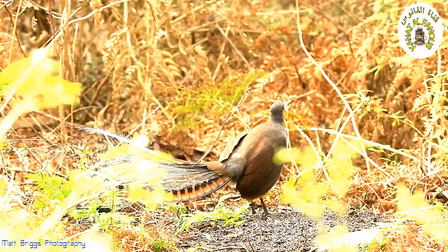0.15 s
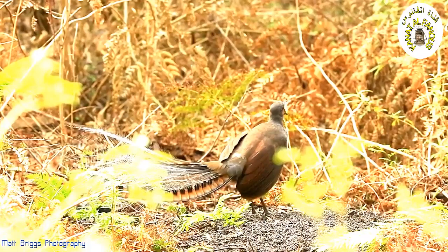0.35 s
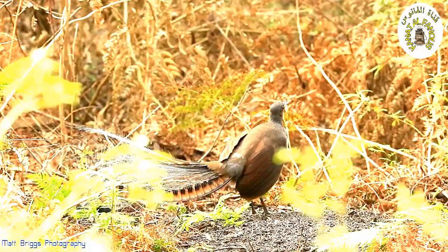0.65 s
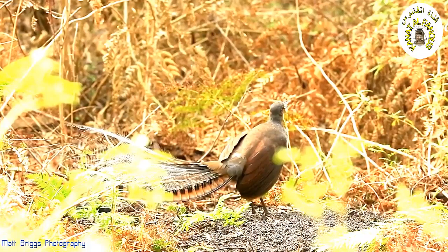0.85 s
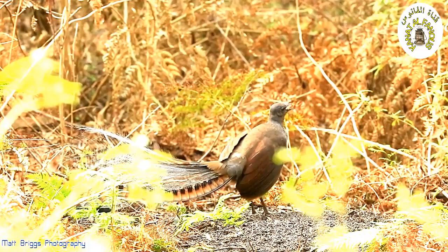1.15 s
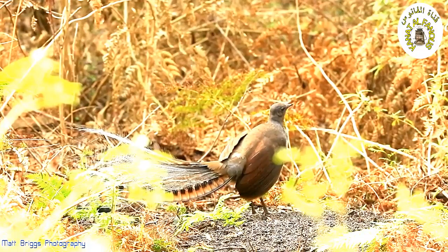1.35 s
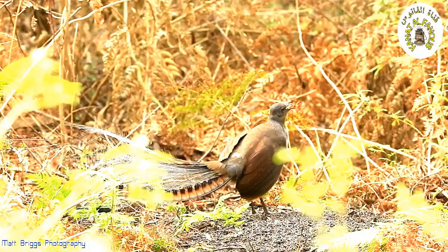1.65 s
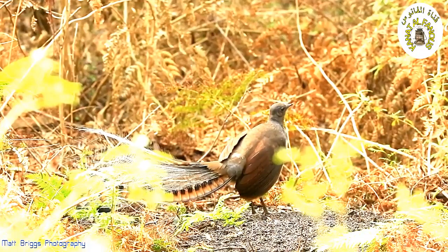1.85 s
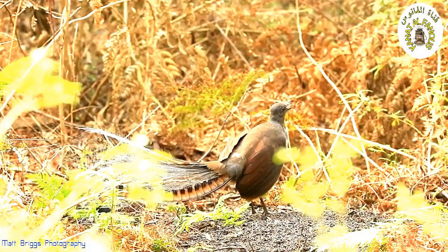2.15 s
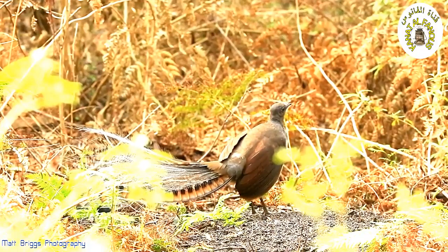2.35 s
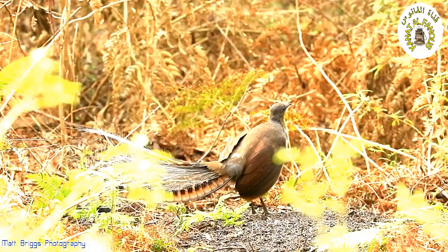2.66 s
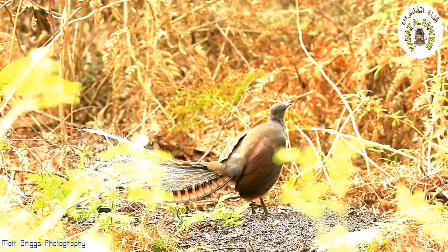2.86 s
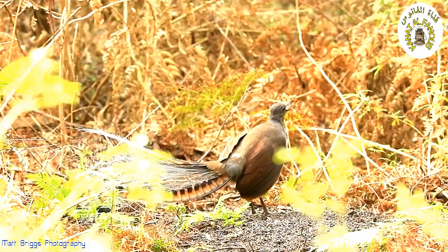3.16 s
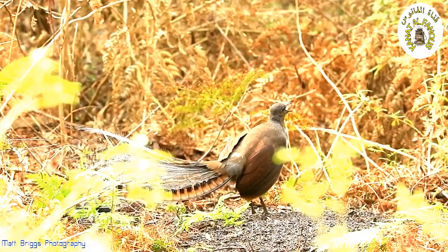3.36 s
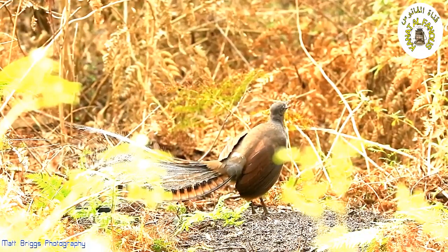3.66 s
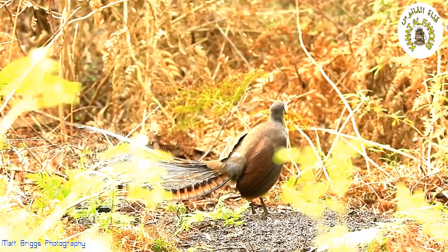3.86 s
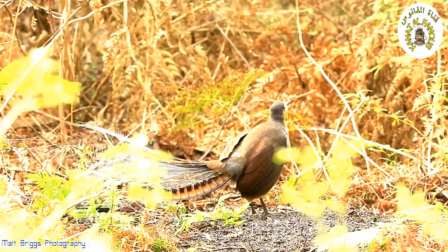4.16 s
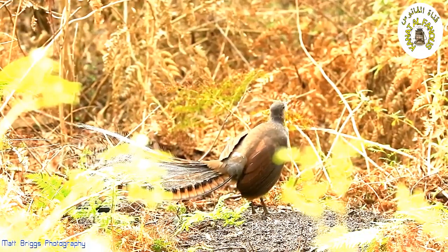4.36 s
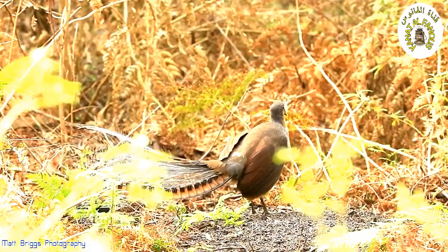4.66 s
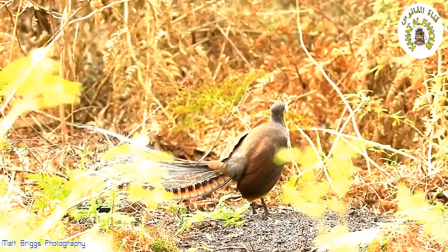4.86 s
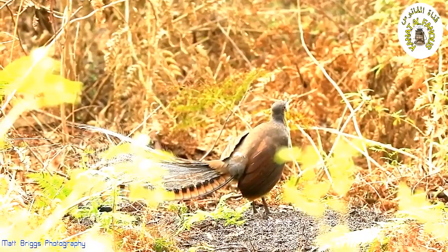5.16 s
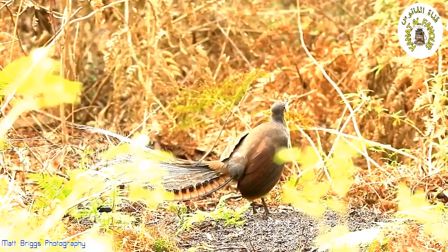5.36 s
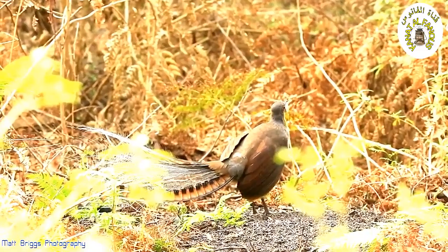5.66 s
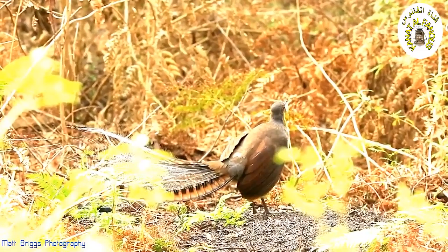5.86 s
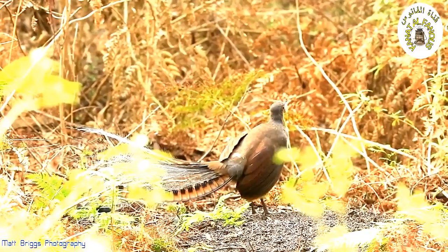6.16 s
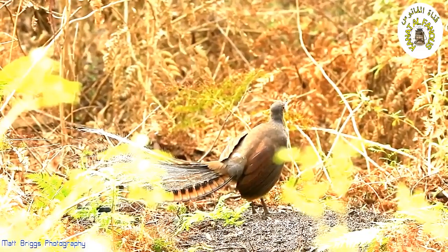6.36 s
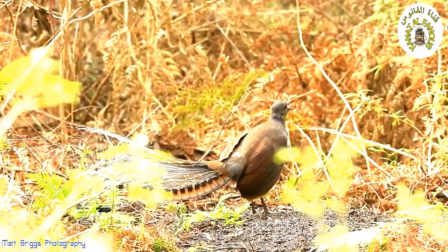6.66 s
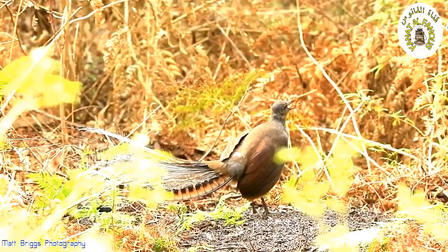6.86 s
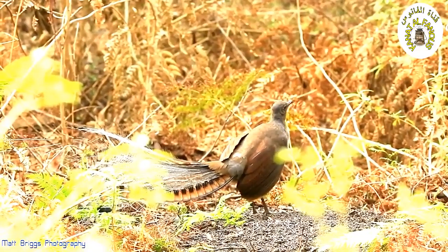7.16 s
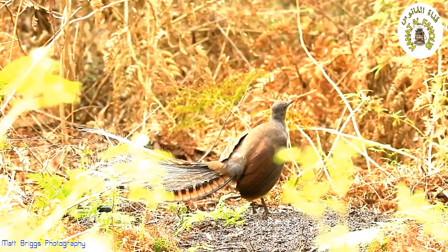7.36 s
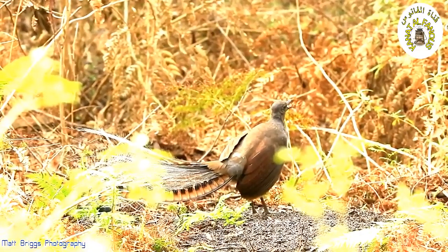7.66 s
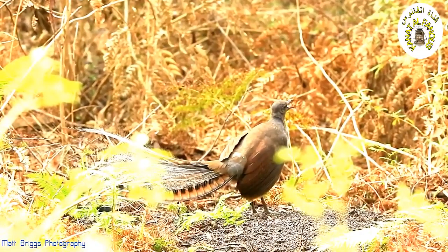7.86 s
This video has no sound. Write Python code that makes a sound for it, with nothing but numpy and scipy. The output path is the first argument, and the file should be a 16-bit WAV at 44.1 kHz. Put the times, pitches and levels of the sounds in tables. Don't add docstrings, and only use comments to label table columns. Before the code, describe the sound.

Outdoors on a forest floor, with low airy hum, leaf rustle and faint hiss, a near lyrebird sings in separated bursts: dropping and arching whistles, dry clicks, short chopped stutters, then after a twig crack a strong run of pure whistles and low leaps. Tiny high birds chip far off. Soft footfalls and ticking litter surround a final falling whistle. The song is close and direct, with a clear woodland echo tail.

```python
import sys
import numpy as np
from scipy import signal
from scipy.fft import rfft, irfft
from scipy.io import wavfile
from scipy.ndimage import uniform_filter1d, minimum_filter1d, map_coordinates

SR = 44100
rng = np.random.default_rng(int(sys.argv[2]) if len(sys.argv) > 2 else 0)


def nominal_scale(level):
    x = np.asarray(level, float) / 20
    return 10 ** x


def file_out(sig):
    cols = np.atleast_2d(sig).T
    lim = np.clip(cols, -1, 1)
    pcm = np.round(lim * 32767).astype(np.int16)
    wavfile.write(sys.argv[1], SR, pcm)


N = 353241

# (time [s], pitch [Hz], level [dB])
DROP = [(.296, 1770, -38), (.306, 1667, -18.5), (.314, 1674, -14), (.338, 1374, -9), (.349, 1235, -14.5),
        (.358, 1125, -35), (.374, 898, -32.5), (.407, 853, -34.5), (.452, 925, -41)]
ARCH = [(.512, 1517, -32), (.535, 1685, -16), (.553, 1678, -15.5), (.587, 2600, -17.5), (.6, 2675, -15.5),
        (.666, 1783, -13), (.683, 1316, -14), (.692, 972, -29.5), (.718, 597, -42)]
PIP = [(1.718, 1620, -33), (1.724, 1410, -21.5), (1.729, 1394, -17.5), (1.737, 1527, -18),
       (1.744, 1600, -27.5)]
CHOP = [(1.762, 3390, -41), (1.766, 2530, -27.5), (1.769, 2780, -18.5), (1.773, 2563, -14.5),
        (1.777, 2666, -18.5), (1.781, 2780, -20.5), (1.785, 2650, -32.5)]
PIP_UP = [(2.237, 2080, -49), (2.242, 1670, -32), (2.248, 1516, -22.5), (2.256, 1547, -27),
          (2.263, 1845, -23.5), (2.2665, 1980, -22)]
CHOP_HIGH = [(2.282, 4640, -37.5), (2.286, 3320, -29), (2.289, 2550, -16.5), (2.293, 2996, -17),
             (2.297, 2650, -16.5), (2.302, 2663, -21), (2.306, 2666, -9.5), (2.309, 2730, -24)]
PLUNGE = [(4.014, 4860, -47), (4.028, 5850, -53), (4.043, 3920, -26), (4.053, 3510, -27.5),
          (4.07, 3026, -19.5), (4.089, 2870, -9), (4.11, 2851, -14.5), (4.121, 2938, -10.5),
          (4.146, 2977, -20)]
SWELL = [(4.215, 2006, -53.5), (4.246, 2037, -23.5), (4.268, 2018, -13), (4.308, 1991, -4.5),
         (4.325, 1977, -21), (4.343, 1978, -7.5), (4.353, 1970, -33.5)]
SLIDE = [(4.803, 4156, -47), (4.811, 3637, -17.5), (4.82, 3475, -16), (4.862, 3412, -9), (4.874, 3170, -12),
         (4.907, 2773, -10), (4.92, 2530, -13.5), (4.933, 2166, -21.5), (4.941, 1960, -19)]
STEP = [(4.938, 1917, -29), (4.969, 1946, -15.5), (5.012, 1850, -16.5), (5.025, 1713, -23.5),
        (5.038, 1335, -23.5), (5.045, 1250, -38)]
LONG = [(6.757, 1266, -23), (6.761, 1535, -26.5), (6.772, 1745, -18), (6.82, 1610, -25.5),
        (6.87, 1575, -22), (6.966, 1554, -21), (7.05, 1478, -19), (7.15, 1402, -16.5), (7.17, 1300, -38)]
# (time from note start [s], pitch [Hz], level [dB])
ZIP = [(0, 1865, -43), (.0025, 2580, -27.5), (.005, 3930, -23), (.0075, 4480, -35)]
SCOOP = [(0, 1810, -42), (.018, 1301, -44.5), (.041, 847, -45.5), (.066, 827, -47.5), (.092, 1072, -38),
         (.106, 1360, -24.5), (.116, 1740, -36), (.124, 1952, -43.5), (.134, 2160, -25)]
TAIL = [(0, 2167, -29.5), (.007, 1765, -24.5), (.016, 1586, -31.5), (.028, 1323, -22), (.049, 1170, -27),
        (.066, 823, -44)]
GRIP = [(0, 1103, -36), (.013, 920, -22.5), (.024, 911, -24.5), (.042, 903, -25), (.055, 752, -32),
        (.059, 1000, -27.5), (.063, 1457, -17), (.068, 1413, -26)]
LEAP = [(0, 1428, -16.5), (.005, 1406, -6), (.016, 1613, -12), (.028, 1806, -6), (.053, 1838, -13.5),
        (.061, 1860, -21.5), (.07, 1770, -38)]
CLEAN, HAZY, HUSKY, HOARSE = .1, .25, .5, .95
ONCE = [(DROP, (-29, -51, -50, -45, CLEAN)), (ARCH, (-38.5, -49, -39.5, -46, HUSKY)),
        (PLUNGE, (-39, -37, -42, -53, CLEAN)), (SWELL, (-47, -51.5, -55.5, -50, CLEAN)),
        (SLIDE, (-32.5, -37, -45, -50.5, CLEAN)), (STEP, (-40, -46, -55, -59.5, HUSKY)),
        (LONG, (-33, -29, -37, -48.5, CLEAN)), (PIP, (-21.5, -31, -48, -39, CLEAN)),
        (PIP_UP, (-17, -23.5, -39.5, -35, CLEAN)), (CHOP, (-13, -32.5, -44, -53, CLEAN)),
        (CHOP_HIGH, (-13.5, -32.5, -47, -60, HAZY))]
# (shape, voice, first start [s], repeat (start [s], stretch [ratio], pitch [ratio], level [dB]))
AGAIN = [
    (ZIP, (-35, -48, -42, -49, HUSKY), .9495, (1.1865, .96, .98, -4)),
    (SCOOP, (-35, -46, -52, -56, HUSKY), .962, (1.205, .92, .97, 0)),
    (TAIL, (-26, -48, -56, -60, HUSKY), 1.813, (2.328, .86, 1.01, -1.5)),
    (GRIP, (-32, -46, -42, -41, HUSKY), 4.405, (4.591, 1.02, 1.044, -2.5)),
    (LEAP, (-34, -43, -43, -52, CLEAN), 4.472, (4.662, .87, .98, -1)),
]
# (time [s], length [s], from [Hz], to [Hz],
# level [dB])
STUTTER = [(1.783, 0.013, 2600, 2330, -17.5), (1.7915, 0.0045, 2400, 2350, -5),
           (1.798, 0.0075, 2560, 2250, -13.5), (1.805, 0.0049, 2055, 1990, -18.5),
           (1.808, 0.0044, 1990, 2150, -15.5), (2.312, 0.0081, 1870, 2150, -23),
           (2.316, 0.0088, 2124, 2540, -18.5), (6.754, 0.0043, 1500, 1180, -25)]
STUTTER_VOICE = (-30, -36, -53, -58.5, HOARSE)
# (centre [Hz], width [ratio], lift [dB])
THROAT = [(3380, 0.1, 5.5), (4348, 0.15, 10.5), (11500, .16, 5.5)]
# (time [s], peak level [dB], pitch [Hz])
CLICKS = [(.9103, -34, 1740), (1.0934, -29, 1940), (1.1091, -28, 1500), (1.1389, -28, 1650),
          (1.3314, -32, 1350), (1.3538, -26, 1640), (1.9003, -25, 1420), (2.395, -33, 1250),
          (2.408, -31, 1400)]
# (time [s], peak level [dB], pitch [Hz])
BILL = [(.9505, -34, 4930), (.952, -41, 7930), (.953, -35, 3584), (1.1875, -38.5, 5100),
        (1.189, -40.5, 7540), (1.19, -38, 3700), (.885, -47, 5150)]
# (time [s], level [dB])
TURNED = [(0, 2), (.3, 0), (0.621, 0.5), (.9, -2), (1.5, 0), (1.7, 0.5), (2.501, 0.5), (3.901, 0),
          (6.502, 0), (6.7, -2)]
# (frequency [Hz], level [dB])
SPRAY = [(2800, -1), (4000, 2), (6000, 8.5), (12000, 10.5)]

# (frequency [Hz], t60 [s])
FERNS = [(700, 0.031), (3000, 0.18), (10000, 0.12)]
TRUNKS = [(700, 0.93), (1500, 0.59), (2500, 0.92), (4000, 0.63), (6000, 0.63), (10000, 0.6)]
HILL = [(700, 6.6), (1800, 4.96), (3500, 2.78), (6000, 2.4), (10000, 1.3)]

# (time [s], level [dB])
WHISTLES = [(1.516, -52), (2.009, -49), (2.498, -46.5), (3.176, -45.5), (6.671, -50)]
# (time [s], pitch [Hz], level [dB])
WHISTLE = [(0, 3727, -2), (.01, 4090, -2), (.033, 4234, -1.5), (.048, 4570, -4.5), (.066, 4530, -10)]
# (time [s], level [dB], pitch [Hz])
CHIPS = [(0.104, -49, 7590), (.41, -54.5, 8230), (.92, -57, 7600), (1.545, -62, 7980), (2.121, -52.5, 7800),
         (2.409, -53.5, 7550), (2.58, -47.5, 7460), (2.64, -57.5, 8230), (2.829, -51, 7280),
         (3.307, -46, 7400), (3.7, -61, 8300), (4.28, -47, 7440), (4.548, -53, 7470), (5.026, -58, 7350),
         (6.071, -58, 7460), (6.085, -46, 7440), (6.315, -48.5, 7640), (6.5, -62, 7670), (6.78, -49, 7580),
         (7.3, -52.5, 7660), (7.535, -57, 8370), (7.574, -58, 8460), (7.77, -50, 7540)]
# (time [s], length [s], from [Hz], to [Hz], level [dB])
CLEAR = [(.155, 0.058, 2880, 5940, -34.5), (3.057, 0.023, 5430, 6370, -53), (3.068, 0.021, 6150, 6330, -52),
         (3.078, .027, 5100, 3690, -55), (3.1, 0.047, 5540, 6130, -68), (3.094, 0.055, 6800, 7000, -59),
         (5.946, 0.04, 5800, 6100, -57), (5.965, 0.018, 4520, 3820, -53), (7.246, 0.041, 7350, 7740, -59.5),
         (7.823, 0.014, 5300, 6320, -51), (7.836, 0.017, 6060, 6300, -57)]
BREATHY = [(2.95, 0.088, 3310, 2074, -55), (3.52, 0.034, 6950, 6440, -51.5), (3.66, 0.053, 8360, 8000, -60),
           (3.356, 0.074, 6340, 8000, -55.5), (3.36, 0.068, 6790, 6570, -48),
           (3.518, 0.15, 6390, 5980, -48.5), (6.39, 0.19, 2704, 2206, -55)]
# (time [s], length [s], from [Hz], to [Hz], level [dB])
HIDDEN = [
    (0.314, 0.071, 3900, 4760, -41.5),
    (2.974, .09, 2960, 2160, -51),
    (3.881, 0.04, 2900, 2060, -47),
]

# (time [s], peak level [dB], pitch [Hz])
SNAP = [(3.8258, -17, 1640), (3.826, -29.5, 770), (3.826, -44, 4230), (3.826, -27.5, 5070),
        (3.836, -28, 1300), (3.845, -31, 1030)]
# (time [s], peak level [dB], pitch [Hz])
TWIGS = [(3.449, -39.5, 2600), (6.508, -43, 1380), (6.5535, -37.5, 1860), (6.621, -36, 1040),
         (7.6294, -48, 1450), (7.7338, -40.5, 1390), (7.913, -41, 2700), (7.9166, -36, 3900),
         (7.926, -39.5, 1700), (7.9364, -37.5, 2280), (7.9475, -41, 1330)]
# (time [s], peak level [dB], pitch [Hz])
TICKS = [(0.0473, -45, 5700), (4.9656, -35.5, 13000), (4.9666, -34.5, 9030), (5.201, -43, 5290),
         (5.4725, -40.5, 5210), (5.5193, -40, 8250), (6.508, -40.5, 7550), (6.6875, -39, 4570),
         (7.5266, -44, 6000), (7.631, -40.5, 8600), (7.7028, -40.5, 5500)]
# (time [s], peak level [dB], pitch [Hz])
THUDS = [(5.199, -34, 320), (6.618, -27, 316), (6.675, -37, 212), (6.704, -29, 665), (7.616, -26, 503)]
# (time [s], length [s], level [dB])
STIRS = [
    (5.4, .1, -63),
    (5.7, .22, -57),
    (6.498, .24, -64),
    (7.503, .22, -60),
]
# (time [s], hum level [dB], rustle level [dB])
FOREST = [(0, -45, -58), (.71, -50, -63), (1.269, -47.5, -58), (1.56, -49, -77.5), (1.81, -50.5, -52),
          (1.92, -48, -73), (3.99, -49.5, -63), (4.3, -46.5, -49), (4.6, -49, -57), (4.78, -50, -56),
          (4.93, -52.5, -51.5), (5.15, -52, -67.5), (5.75, -47, -56.5), (6.5, -46.5, -60), (6.76, -46, -51),
          (6.98, -42.5, -56.5), (7.39, -45.5, -59.5), (8.01, -47.5, -60.5)]
# (frequency [Hz], density [dB per Hz])
STIRRED = [(2500, -20), (4500, 4.5), (8500, 4), (11000, -2.5), (15600, -9.5)]
HUM = [(12, -62.5), (23, -16.5), (81, -11.5), (287, -3), (332, -3.5), (409, -4), (436, -9.5), (610, 0),
       (908, -17.5), (988, -13), (1670, -15), (2540, -35), (3000, -29.5), (3900, -57.5), (6600, -120)]
RUSTLE = [(1180, -9.5), (2000, -1.5), (2240, -4), (2550, -6.5), (4160, -13.5), (7930, -19.5), (9180, -21.5),
          (14900, -23.5), (15600, -32.5)]
HISS = [(1760, -26.5), (3000, 0.5), (5000, -2.5), (6600, -6.5), (7630, -4), (11000, -12), (15600, -15)]


def along(points, hz):
    f, v = np.transpose(points)
    return np.interp(np.log(hz + 1), np.log(f + 1), v)


def wobble(rate, n=N):
    return map_coordinates(rng.standard_normal(int(n * rate / SR) + 4), [np.arange(n) * rate / SR])


def add(track, s, sound):
    part = track[round(s * SR):][:len(sound)]
    part += sound[:len(part)]


def note(rows, voice, flutter):
    s, hz, db = np.transpose(rows)
    *overtones_db, hoarse = voice
    t = np.arange(s[0], s[-1], 1 / SR)
    n = len(t)
    hz = uniform_filter1d(np.interp(t, s, hz), size=min(90, n // 6), mode="nearest")
    hz *= 1 + flutter * wobble(90, n)
    hz *= 1 + .018 * hoarse ** 2 * wobble(350, n)
    db = uniform_filter1d(np.interp(t, s, db), size=70, mode="nearest")
    phase = 2 * np.pi * np.cumsum(hz) / SR

    glide = uniform_filter1d(np.gradient(np.log(hz)) * SR, size=300, mode="nearest")
    falling, rising = np.clip(-glide, 0, 25), np.clip(glide, 0, 25)
    effort = np.clip(falling + .3 * rising - 1, 0, 4)
    strain = .1 * uniform_filter1d(effort, size=1500, mode="nearest")

    tone = np.sin(phase)
    for k in range(2, 10):
        level = overtones_db[min(k, 5) - 2] - 4.4 * max(k - 5, 0) + 1.87 * wobble(40.4, n)
        level += .22 * (db - db.max())
        level -= falling + .5 * (k > 3) * rising
        for centre_hz, width, lift_db in THROAT:
            level += lift_db * np.exp(-(np.log(k * hz / centre_hz) / width) ** 2)
        scatter_rad = (hoarse + strain) * (k - 1.2) * wobble(600, n)
        tone += nominal_scale(level) * (k * hz < SR / 2) * np.sin(k * phase + scatter_rad)

    ramp_s = min(.004, n / SR / 5)
    edge = np.clip(np.minimum(t - s[0], s[-1] - t) / ramp_s, 0, 1)
    return np.sqrt(2) * nominal_scale(db) * edge * tone


def knocks(events, cycles, crack, smooth, rise=4):
    out, t = np.zeros(N), np.arange(SR // 20) / SR
    fade = nominal_scale(-60 * t / .009)
    for s, db, hz in events:
        ring = np.sin(2 * np.pi * hz * t) * nominal_scale(-60 * t * hz / cycles)
        ring *= 1 - np.exp(-t * hz * rise)
        noise = signal.lfilter(np.hanning(smooth + 2), 1, rng.standard_normal(len(t))) / np.sqrt(smooth)
        add(out, s, nominal_scale(db) * (1.77 * ring + crack * fade * noise))
    return out


def singer():
    out = knocks(CLICKS, cycles=30, crack=0.35, smooth=12, rise=1.2)
    notes = list(ONCE)
    for shape, voice, first, (s, stretch, ratio, db) in AGAIN:
        notes.append((np.add(shape, [first, 0, 0]), voice))
        notes.append((np.multiply(shape, [stretch, ratio, 1]) + [s, 0, db], voice))
    for s, length, from_hz, to_hz, db in STUTTER:
        middle = (s + length / 2, np.sqrt(from_hz * to_hz), db)
        notes.append(([(s, from_hz, db - 6), middle, (s + length, to_hz, db - 3)], STUTTER_VOICE))
    for rows, voice in notes:
        sound = note(rows, voice, flutter=.0026)
        tremble_db = 1.12 * (1.08 + voice[-1]) * wobble(130.7, len(sound))
        add(out, rows[0][0], sound * nominal_scale(tremble_db))
    return out


def scatter(decays, delay):
    hz, t, z = signal.stft(rng.standard_normal(5 * SR // 2), SR, nperseg=256)
    tail = signal.istft(z * nominal_scale(-60 * t / along(decays, hz)[:, None]), SR, nperseg=256)[1]
    tail *= np.clip(np.arange(len(tail)) / SR / delay - 1, 0, 1)
    return tail / np.linalg.norm(tail)


def trunks(x, ferns_db, trunks_db):
    echoes = nominal_scale(ferns_db) * scatter(FERNS, delay=0.0017) + nominal_scale(trunks_db) * scatter(TRUNKS, delay=0.01)
    return x + signal.fftconvolve(x, echoes)[:N]


def near_bird():
    bird = singer()
    sent = bird * nominal_scale(np.interp(np.arange(N) / SR, *np.transpose(TURNED)))
    sent = irfft(rfft(sent) * nominal_scale(along(SPRAY, np.fft.rfftfreq(N, 1 / SR))), N)
    near = bird + trunks(sent, ferns_db=-12, trunks_db=-12) - sent
    slope = nominal_scale(-30.5) * signal.fftconvolve(sent, scatter(HILL, delay=0.034))[:N]
    bill = trunks(knocks(BILL, cycles=17.4, crack=0.5, smooth=6), ferns_db=5, trunks_db=8.5)
    return near + slope + bill


def sweep(length, from_hz, to_hz, db, breath):
    n = max(int(length * SR), 8)
    hz = np.geomspace(from_hz, to_hz, n) * (1 + 0.045 * breath * wobble(1500, n))
    phase = 2 * np.pi * np.cumsum(hz) / SR
    octave = np.clip(breath - .55, 0, .15)
    swell = np.sin(np.pi * np.arange(n) / n) ** 0.8
    return np.sqrt(2) * nominal_scale(db) * swell * (np.sin(phase) + octave * np.sin(2 * phase))


def far_birds():
    out = np.zeros(N)
    for s, db in WHISTLES:
        add(out, s, nominal_scale(db + 6.5) * note(WHISTLE, voice=(-48, -69, -74, -76, 0), flutter=.002))
    for s, db, hz in CHIPS:
        add(out, s, sweep(.01, 1.24 * hz, .68 * hz, db - 5, breath=.9))
        add(out, s + .006, sweep(.014, 1.02 * hz, .99 * hz, db, breath=.3))
        add(out, s + .017, sweep(.016, .99 * hz, 1.06 * hz, db - 4, breath=.3))
        add(out, s - .012, sweep(.014, 1.02 * hz, 1.08 * hz, db - 8, breath=.5))
    for calls, breath in ((CLEAR, .1), (BREATHY, .75)):
        for s, *call in calls:
            add(out, s, sweep(*call, breath * 6500 / call[1]))
    return out


def hidden():
    out = np.zeros(N)
    for s, *call in HIDDEN:
        add(out, s, sweep(*call, .3 * 6500 / call[1]))
    return trunks(out, ferns_db=-8, trunks_db=-3.5) - out


def litter():
    ticks = knocks(TICKS, cycles=22, crack=1.0, smooth=2)
    ticks += knocks(TWIGS, cycles=34, crack=1.0, smooth=5)
    ticks += knocks(SNAP, cycles=15, crack=0.24, smooth=14, rise=1.0)
    ticks += knocks(THUDS, cycles=7.9, crack=.05, smooth=9)
    return trunks(nominal_scale(-1.5) * ticks, ferns_db=-1.5, trunks_db=-11.5)


def rush(spectrum, patchy_db):
    hz, _, z = signal.stft(rng.standard_normal(N + 2048), SR, nperseg=2048)
    field = uniform_filter1d(uniform_filter1d(rng.standard_normal(z.shape), 20, 0), 3, 1)
    gain_db = along(spectrum, hz)[:, None] + patchy_db * field / field.std()
    x = signal.istft(z * nominal_scale(gain_db), nperseg=2048)[1][:N]
    return x / x.std()


def stirred():
    t = np.arange(N) / SR
    swell = np.zeros(N)
    for s, length, db in STIRS:
        swell += nominal_scale(db) * np.sin(np.pi * np.clip((t - s) / length, 0, 1)) ** .7
    return swell * nominal_scale(2.5 * wobble(70)) * rush(STIRRED, patchy_db=1)


def forest():
    s, hum_db, rustle_db = np.transpose(FOREST)
    t = np.arange(N) / SR
    hum = nominal_scale(np.interp(t, s, hum_db) + 1.2 * wobble(4.4)) * rush(HUM, patchy_db=0.66)
    gusts_db = .9 * wobble(14)
    leaves = nominal_scale(np.interp(t, s, rustle_db) + 3 + gusts_db) * rush(RUSTLE, patchy_db=.6)
    return hum + leaves + nominal_scale(-59.5) * rush(HISS, patchy_db=0)


def scene():
    far = trunks(far_birds(), ferns_db=-5.5, trunks_db=-3)
    return (near_bird() + far + hidden() + litter() + stirred() + forest())[None]


def band_limit(x):
    return signal.sosfilt(signal.butter(12, 15800, fs=SR, output="sos"), x)


def record(dry):
    knee_db, squeeze, hold_s, recover_db_per_s = -6, 0.83, 0.087, 59.5
    ceiling, top_hz = .56, 15750
    sound = dry * nominal_scale(1.5)

    half = round(hold_s * SR / 2)
    peak = -minimum_filter1d(-abs(sound), size=2 * half + 1, origin=half - 40)
    cut_db = squeeze * np.clip(20 * np.log10(peak + 1e-9) - knee_db, 0, None)
    ramp_db = recover_db_per_s * np.arange(N) / SR
    cut_db = np.maximum.accumulate(cut_db + ramp_db, axis=1) - ramp_db
    sound = sound * nominal_scale(-uniform_filter1d(cut_db, size=60))

    needed = minimum_filter1d(np.minimum(1, ceiling / (abs(sound) + 1e-9)), size=400)
    sound = sound * uniform_filter1d(needed, size=200)
    sound = irfft(rfft(sound) * (np.fft.rfftfreq(N, 1 / SR) < top_hz), N)
    return band_limit(sound)


dry = scene()
out = record(dry)
file_out(out)
```